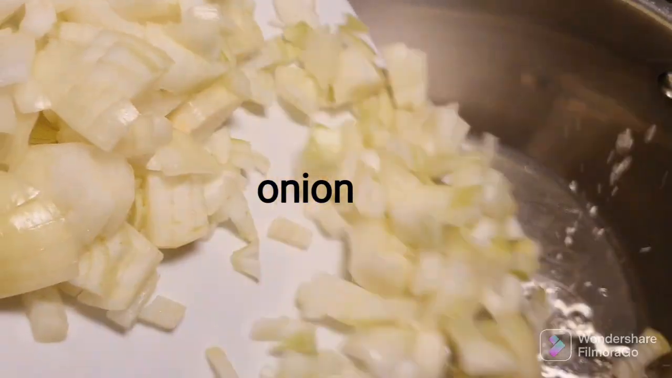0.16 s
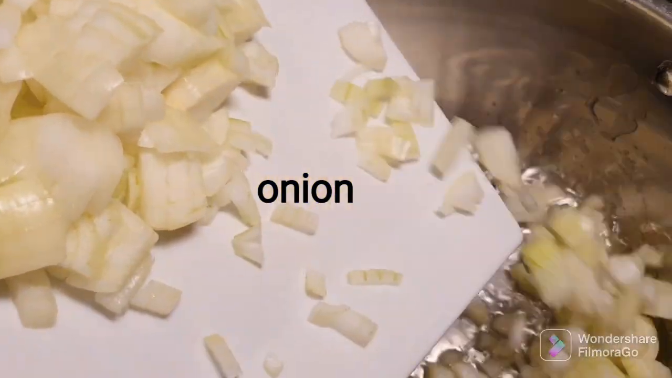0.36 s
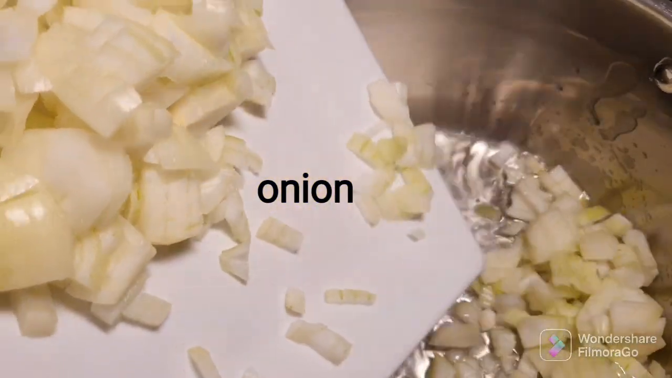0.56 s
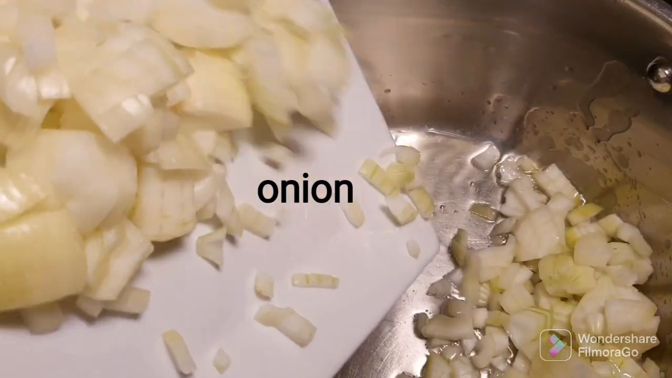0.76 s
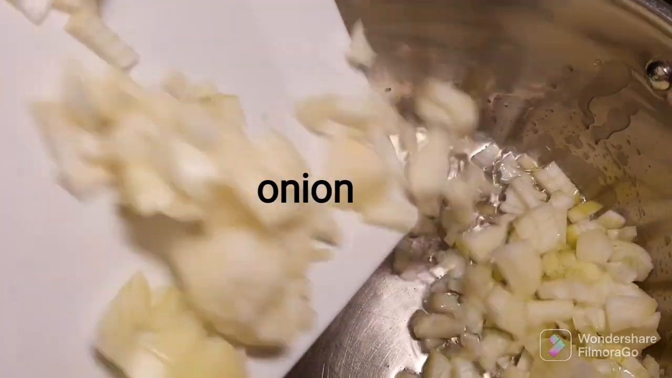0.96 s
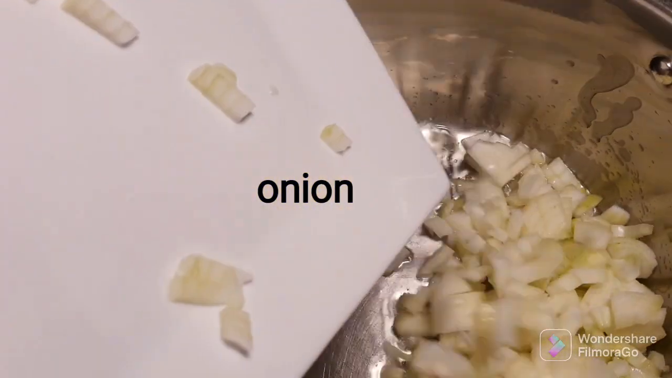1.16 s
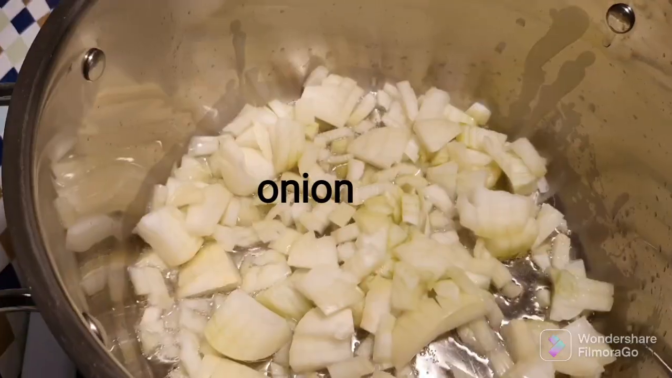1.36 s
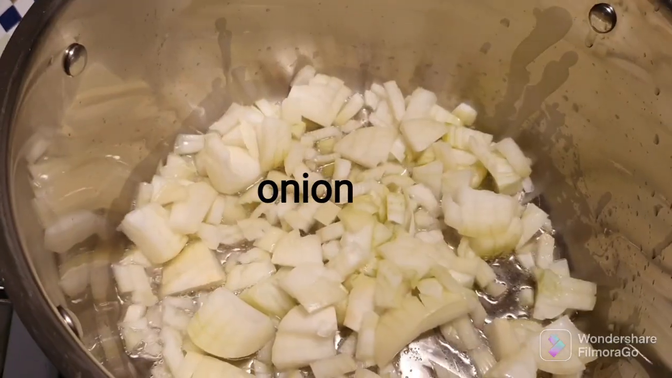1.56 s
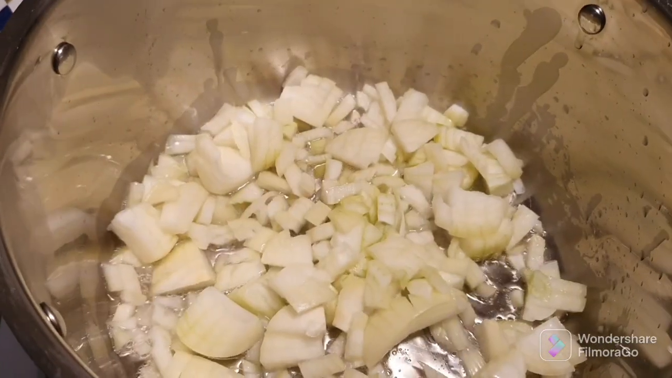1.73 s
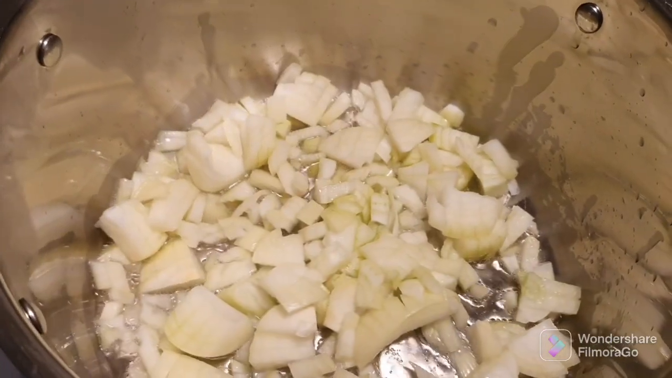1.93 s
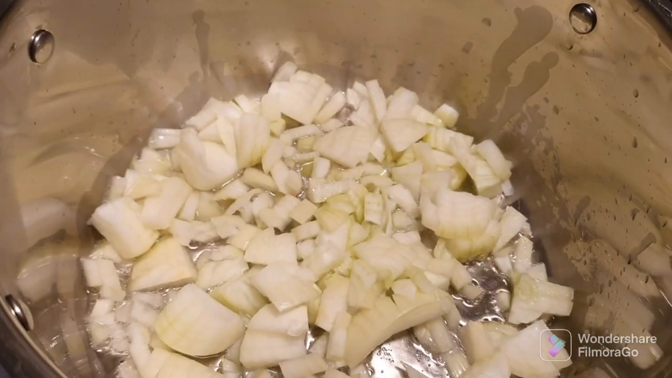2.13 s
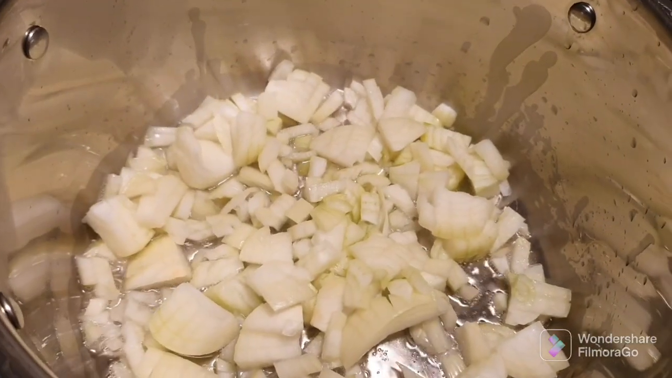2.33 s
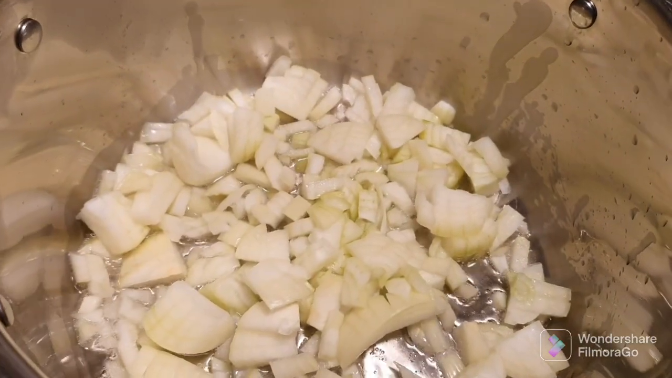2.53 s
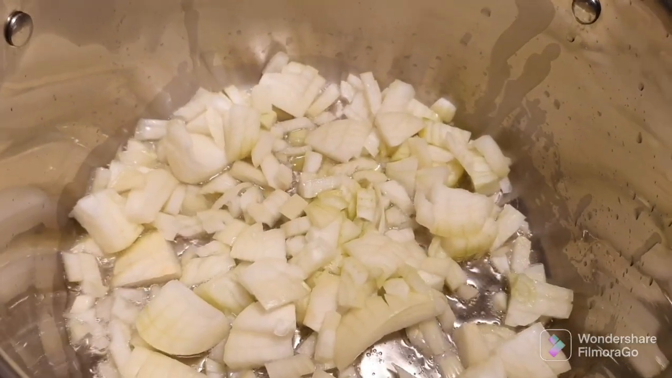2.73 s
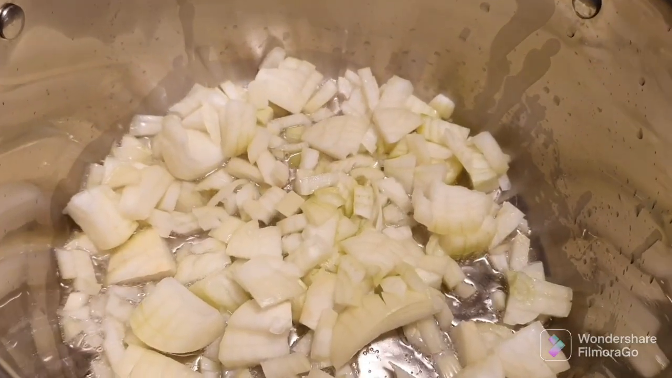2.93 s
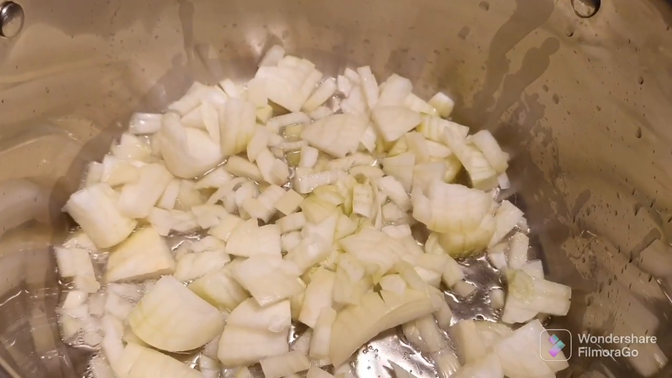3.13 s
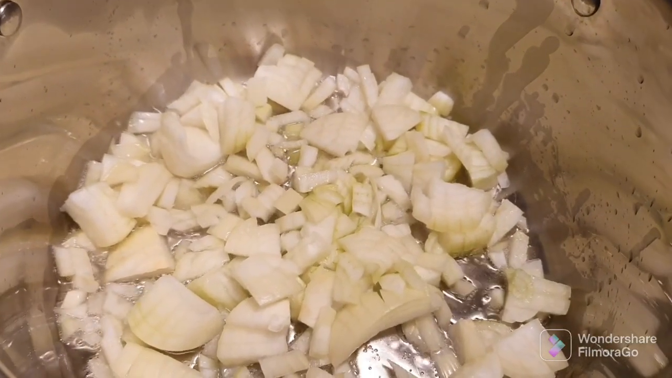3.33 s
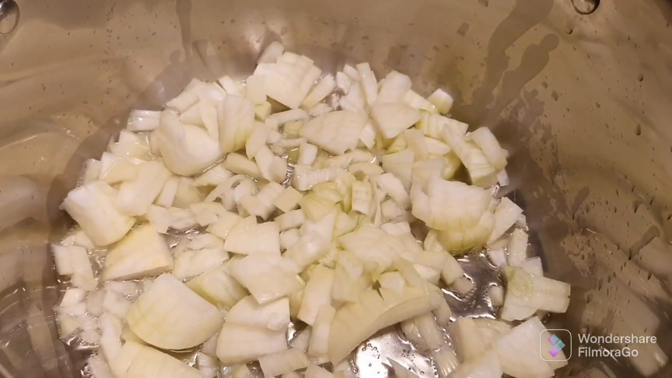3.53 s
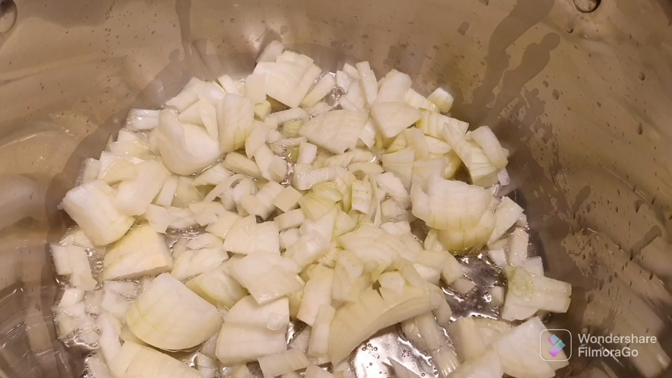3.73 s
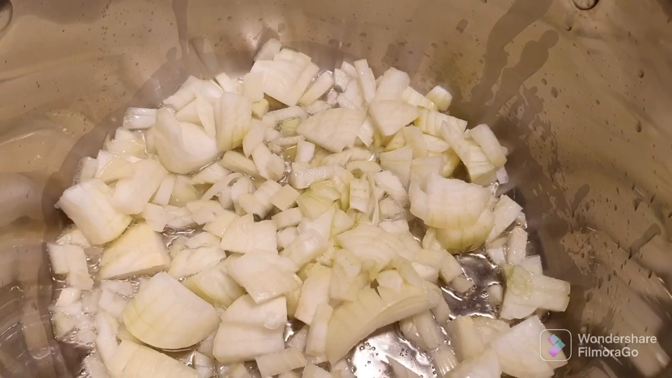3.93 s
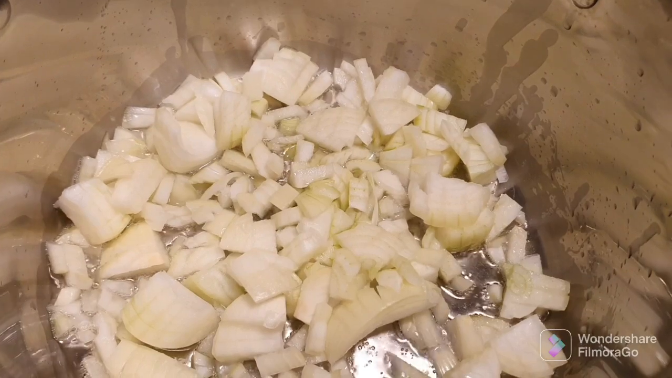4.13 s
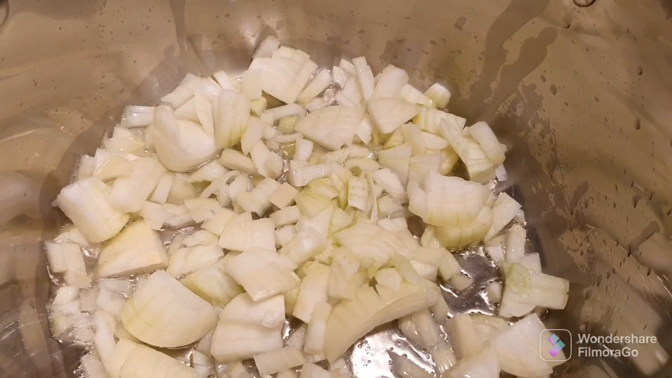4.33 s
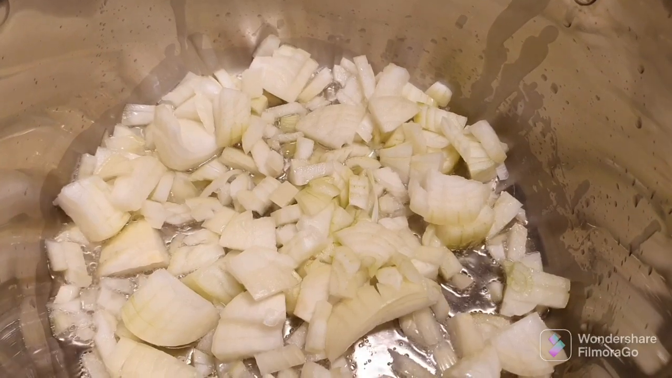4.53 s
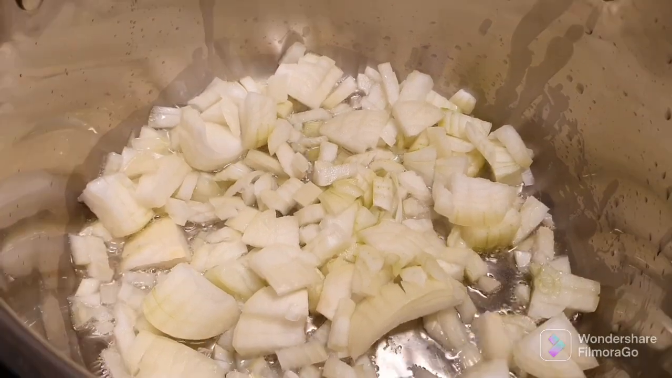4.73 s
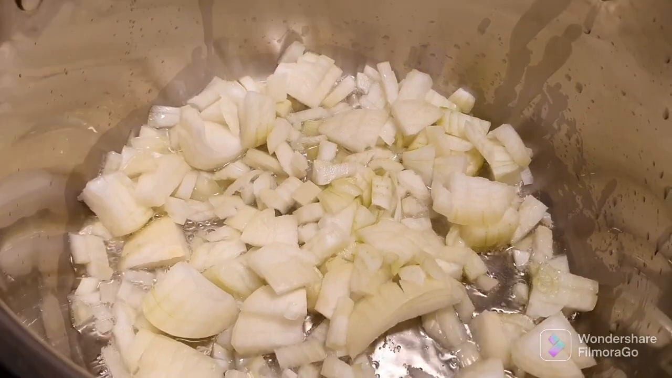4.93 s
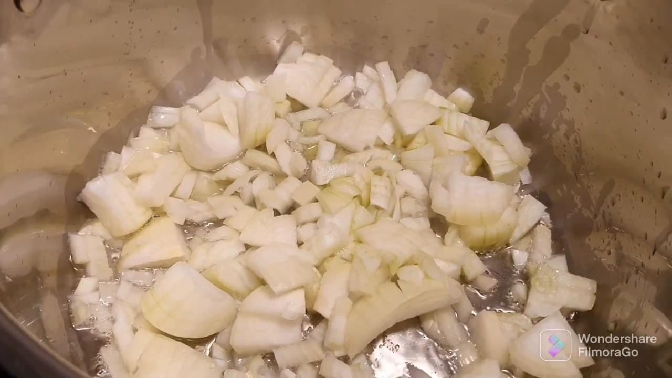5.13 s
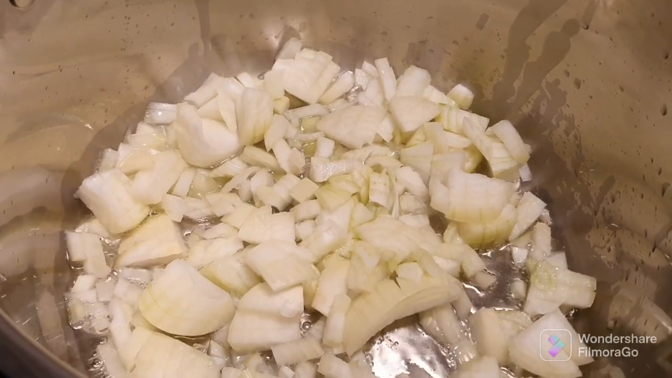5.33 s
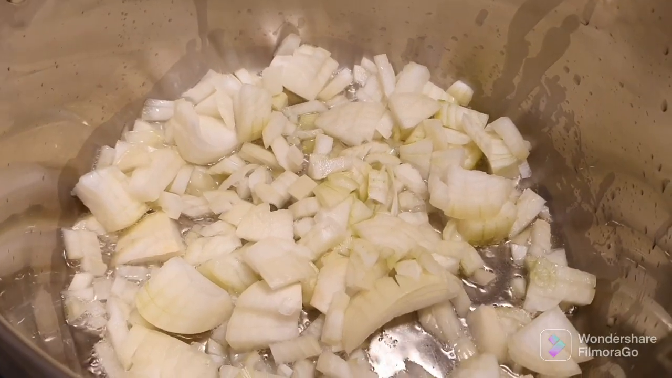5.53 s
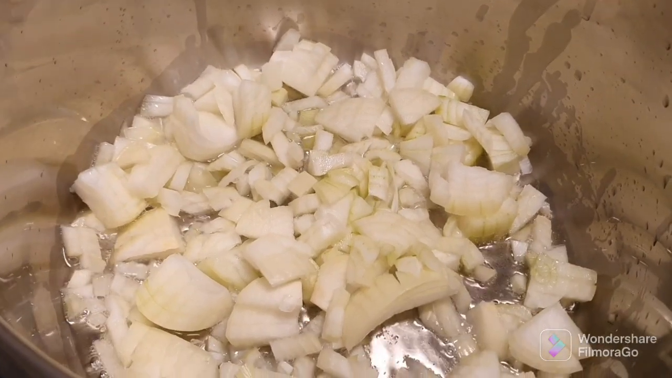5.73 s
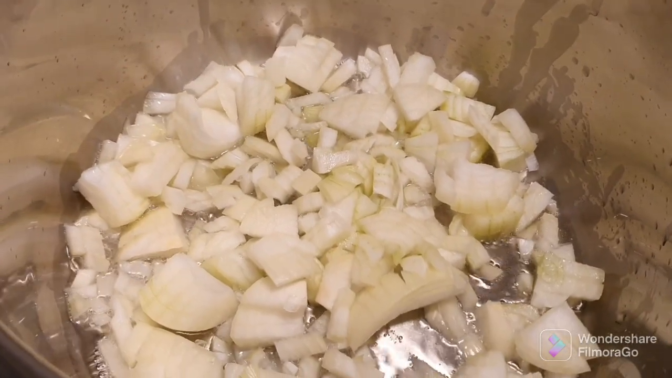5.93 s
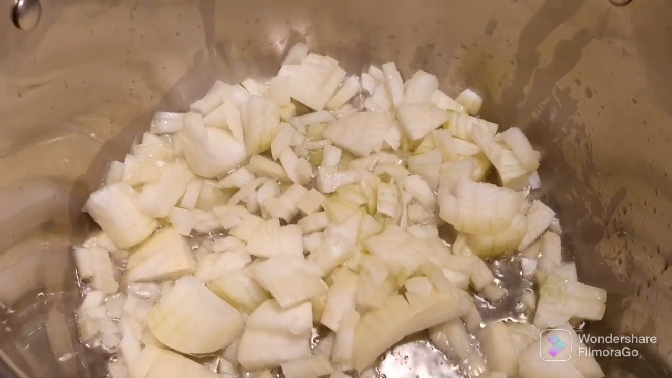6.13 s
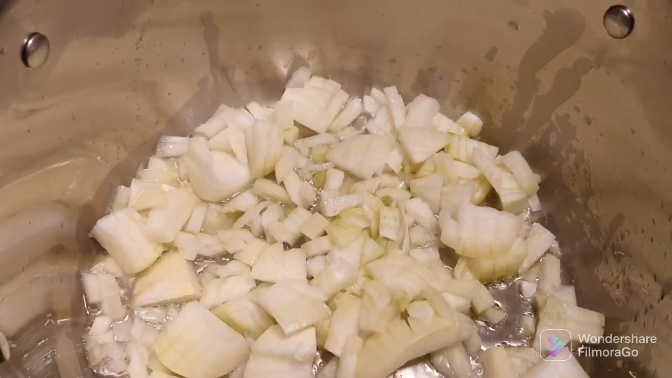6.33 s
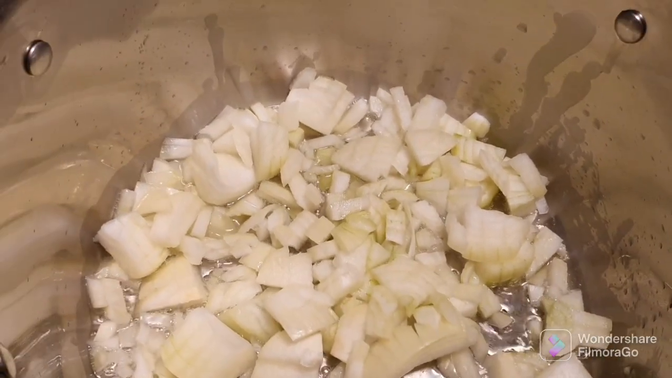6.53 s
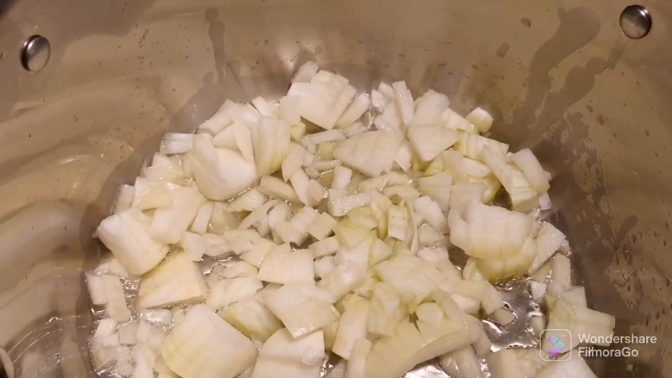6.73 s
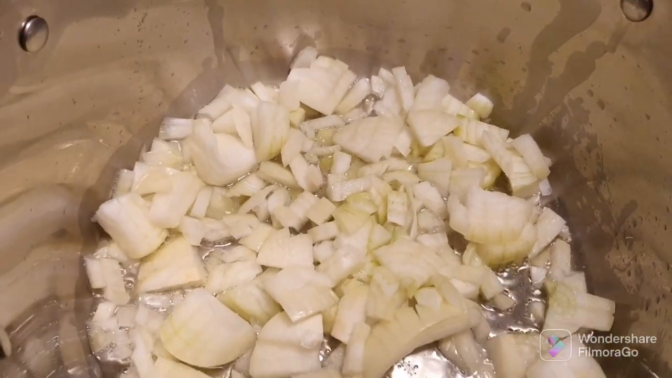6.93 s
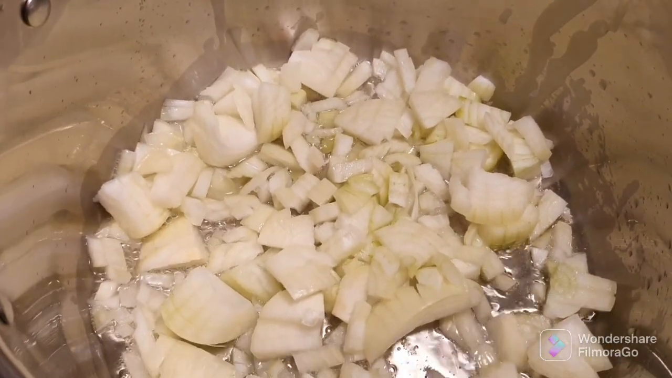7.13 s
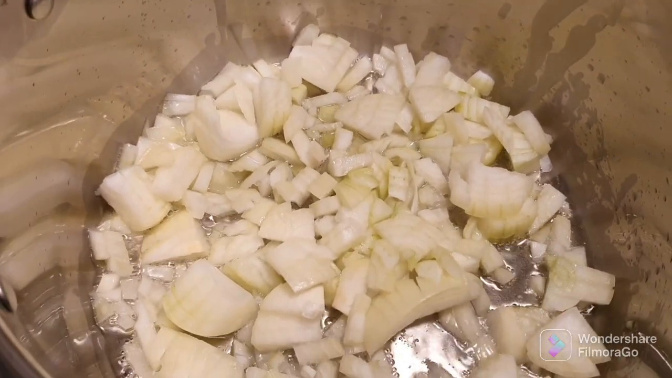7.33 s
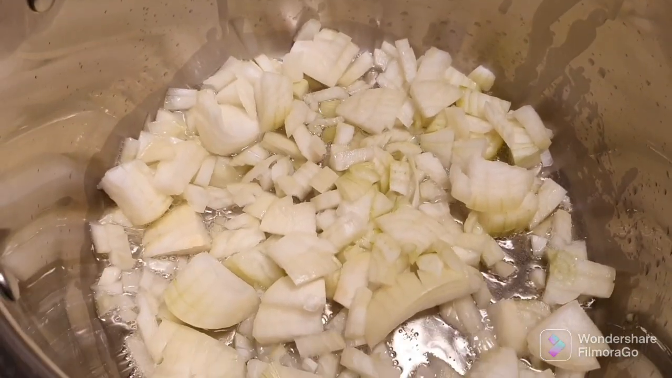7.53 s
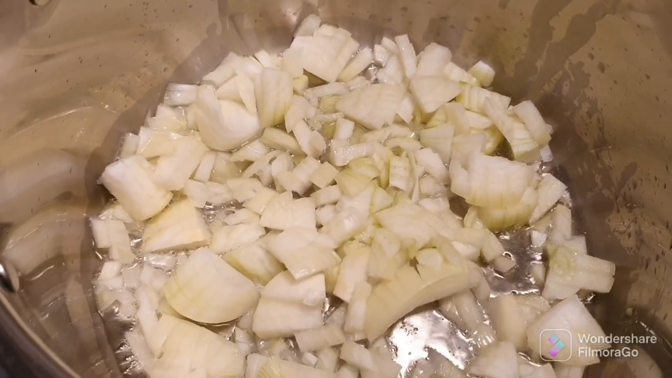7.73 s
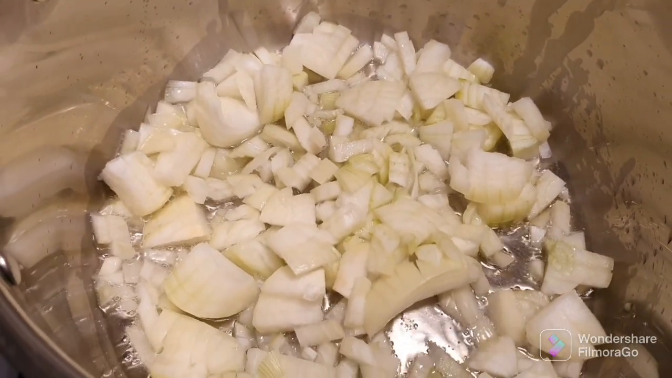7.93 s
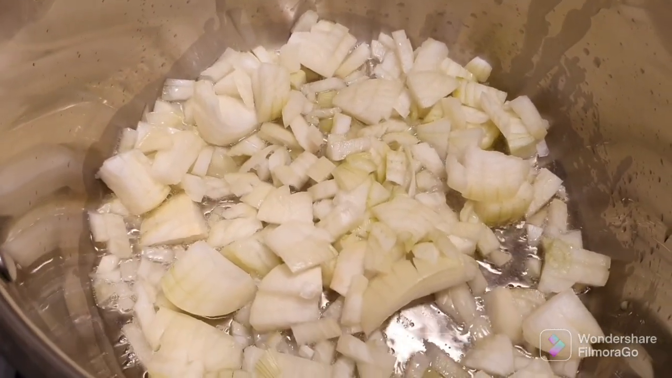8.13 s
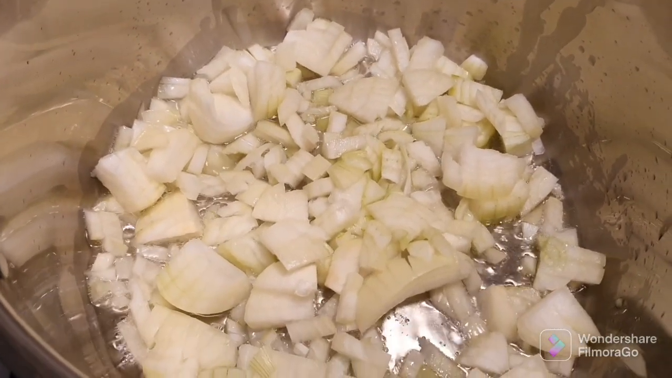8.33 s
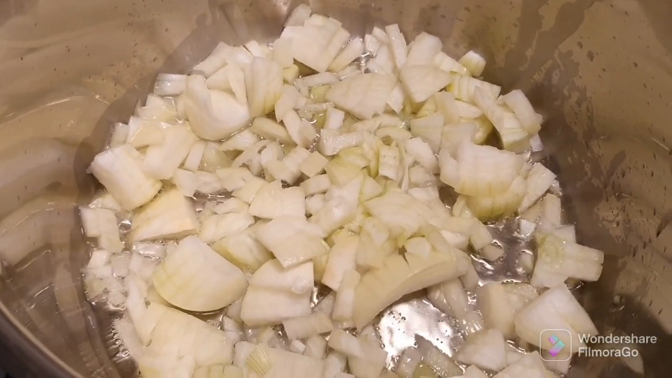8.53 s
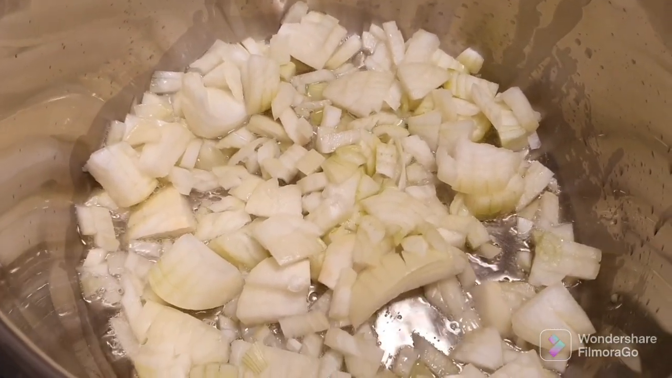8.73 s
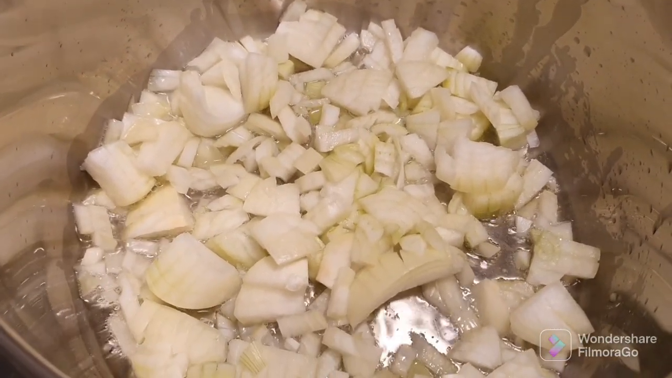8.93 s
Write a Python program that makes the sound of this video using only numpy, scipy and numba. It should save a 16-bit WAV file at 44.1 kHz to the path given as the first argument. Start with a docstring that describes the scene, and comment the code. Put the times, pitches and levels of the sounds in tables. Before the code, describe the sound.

A faint steel rub and low drone, then wet onion pieces tumble into hot oil, splashing and slapping softly as the sizzle bursts up. The plastic board strikes the metal rim with a bright, rattling knock. More pieces fall, the board leaves, and fine crackling continues inside the resonant pot, heard close from above, with scattered loud pops, a brief gap midway and rougher, gradually louder frying.

```python
"""A low stove drone and a faint rub of steel come first; then chopped onion slides off a board into hot oil.
Water boils out of the wet pieces in thousands of tiny bursts a second, with a louder spit now and then.
Each heap flares up and sinks to a steady sizzle; halfway the sound drops out for an instant, and the sizzle
is at once coarser, then grows as the pot regains its heat. Standing waves of the air in the pot colour it,
the plastic board chatters on the resonant steel wall, and two microphone ports above the rim hear it all."""
import sys
import numpy as np
from scipy import signal
from scipy.fft import rfft, irfft
from scipy.io import wavfile
from scipy.ndimage import uniform_filter1d, minimum_filter1d
from numba import njit

SR = 44100
rng = np.random.default_rng(int(sys.argv[2]) if len(sys.argv) > 2 else 0)


def to_wav(s):
    """Save 16-bit WAV."""
    ch = np.atleast_2d(s).T  # columns
    pcm = np.round(np.clip(ch, -1, 1) * 32767)  # PCM
    wavfile.write(sys.argv[1], SR, pcm.astype(np.int16))


N = 395577
TIME = np.arange(N) / SR

# low drone of the stove, relative spectrum: (f/Hz, level/dB)
STOVE_SPECTRUM = [(20, -19), (35, -39), (55, 5), (80, -5.5), (120, 5.5), (155, -5.5), (225, 8.5), (300, -6),
                  (450, 0), (1000, -17.5), (2300, -41), (3200, -34), (6000, -36), (12000, -52)]
# modes of the steel wall: (f/Hz, relative level/dB, time to fall by 60 dB t/s)
STEEL_MODES = [(169.4, -30.5, 0.28), (382, -28, 0.47), (455, -38, 0.3), (565, -21, 0.2), (795, -17, 0.17),
               (906, -17, 0.21), (998, -24, 0.3), (1308, -16, 0.13), (1580, -16, 0.08), (1835, -22, 0.17),
               (2115, -14.5, 0.19), (2375, -29, 0.35), (2492, -26, 0.6), (2728, -22, 0.13),
               (3305, -17, 0.1), (3480, -19, 0.1), (3560, -25, 0.18), (4040, -25, 0.16), (4850, -18, 0.15),
               (5635, -21, 0.11), (5951, -28, 0.2), (6204, -24, 0.16), (6870, -31, 0.17)]
# pieces sliding off the board and tumbling over each other: (start t/s, length t/s, level/dB)
SLIDES = [(0.01, 0.09, -57), (0.122, 0.043, -41), (0.27, .03, -38), (0.366, 0.084, -43), (0.53, 0.033, -54),
          (0.704, .025, -46), (0.78, 0.018, -38.5), (0.996, 0.024, -40.5), (1.07, 0.034, -44),
          (1.156, 0.061, -47), (1.445, 0.24, -72)]
# clumps landing or slumping in the oil, relative levels: (t/s, splash level/dB, thud level/dB, tap level/dB)
CLUMPS = [(0.1072, -30, -49, -43), (0.13, -21, -49.5, -30.5), (0.159, -34, -31, -43),
          (0.183, -30, -52, -52), (0.221, -32, -35, -32.5), (0.2485, -9.5, -40, -39), (.299, -38, -34, -36),
          (.366, -24, -31.5, -56), (.423, -40, -39, -43), (.439, -25, -31, -32), (0.458, -29, -29, -41),
          (.485, -22, -33, -48), (.878, -28, -57, -30.5), (1.0092, -15.5, -43, -45), (1.074, -47, -52, -44),
          (1.1142, -15, -39, -56), (1.134, -38, -52, -38), (1.199, -22, -49, -45),
          (1.2142, -15, -28.5, -42), (1.258, -17, -34, -49), (1.28, -20, -38, -56), (1.461, -20, -63, -44),
          (1.706, -15, -59, -48), (1.72, -23, -54, -42), (1.733, -39, -50, -42), (4.477, -21, -65, -37)]
# heaps of onion reaching the oil: (t/s, relative level of the lasting sizzle/dB)
HEAPS = [(.128, -58), (.236, -45.5), (.39, -41.5), (.52, -41.5), (.98, -43), (1.17, -50.5), (1.42, -46.5)]
# standing waves of the air under the board: (f/Hz, width/Hz, level over the direct sound/dB)
COVERED_AIR_MODES = [(224, 16, 11), (449, 28.6, 19), (975, 39, 14.5), (1085, 96, 11), (1896, 240, 2.5),
                     (2440, 210, -1)]
# standing waves of the air in the open pot: (f/Hz, width/Hz, level over the direct sound/dB)
OPEN_AIR_MODES = [(222, 11.4, 13.5), (437, 62, 14), (987.5, 43.6, 11.5), (1386, 22, 5), (1510, 26, 7.5),
                  (1828, 18.6, 9.5), (2154, 27, -7), (2497, 27, 3.5), (747, 32, 1)]
# gain for the crackle under the board: (f/Hz, level/dB)
BOARD_GAIN = [(250, 6.5), (550, -2.5), (700, 5), (830, -14.5), (980, 9), (1500, 1.5), (2200, 0)]
# gain for all the crackle: (f/Hz, level/dB)
SIZZLE_GAIN = [(150, -26.5), (330, -22), (630, -23.5), (800, -15.5), (1200, -12.5), (2000, -6),
               (2700, -0.84), (3700, -0.5), (4900, -2), (6300, -13.5), (7700, -19), (10000, -22.5),
               (13000, -28), (15300, -35.5)]
# relative spectrum of patter and slaps: (f/Hz, level/dB)
TAP_SPECTRUM = [(100, -26), (300, -6), (500, -9.5), (720, 1.5), (1000, -9), (1600, -2), (3000, -32),
                (6000, -38)]
# relative spectrum of the tumbling pieces: (f/Hz, level/dB)
TUMBLE_SPECTRUM = [(25, -17), (50, 5), (100, 7.5), (150, -2.5), (230, -14.5), (330, -9), (450, -8.5),
                   (700, -5), (1100, -13), (1600, -19), (3000, -28), (6000, -33)]
# drops of water bursting in the oil: (t/s, peak level/dB, f/Hz, rise t/ms, wall echoes relative to the ping/dB)
SPITS = [(0.248, -17, 3120, 0.35, -10), (0.25, -20, 3400, 0.34, -4), (.281, -25, 6040, 0.32, 5),
         (0.8442, -7.5, 4520, 0.58, -2), (1.0935, -25, 3020, .7, -4), (1.206, -15, 2960, 0.48, -2),
         (1.215, -19, 3200, 0.28, -1), (1.8496, -9, 4380, 0.53, -14), (2.186, -16, 3380, 0.64, -3),
         (2.949, -22, 4120, 0.37, -1), (3.9172, -7.5, 3080, 0.36, -10), (3.9174, -14, 5000, 0.44, -2),
         (4.137, -27, 3030, 0.27, 4), (6.912, -30, 5610, 1.4, -1), (6.919, -26, 4790, 4.4, -1),
         (7.6286, -12.5, 3150, 0.58, -1), (7.6316, -12, 3500, 0.31, -6), (7.662, -25, 2950, 0.7, 4),
         (8.716, -18, 2930, 0.21, -9)]
# blows of the board on the pot, relative levels: (t/s, clack level/dB, ring level/dB)
KNOCKS = [(0.7231, -3, -2.5), (0.728, -17.5, -34), (0.7356, -26, -26), (0.7388, -24, -28),
          (0.7488, -20, -20), (0.757, -31, -28), (0.767, -26, -17), (0.8007, -24, -21), (0.8037, -22, -18),
          (0.817, -30, -30)]
# relative spectrum of the plastic clack: (f/Hz, level/dB)
CLACK_SPECTRUM = [(100, -29), (250, -9), (530, 9.5), (700, 1.5), (900, 15), (1300, 6), (1900, 9),
                  (3000, -4), (3650, 5), (4200, -0.5), (5500, -2), (7500, -19), (12000, -28), (15000, -67)]
# difference between the two ports for sound from the pot: (f/Hz, left minus right level/dB)
PORT_DIFFERENCE = [(120, -3), (220, -5), (370, -2.5), (500, 0), (1200, 2.5), (2200, -1.5), (3000, -4.5),
                   (4000, -6), (4500, 4.5), (5100, 6.5), (6300, 12.5), (8000, 4), (8800, 0.5), (9900, 2),
                   (13500, -6.5)]
# the instant for which the sound drops out: (start t/s, end t/s)
DROPOUT = (4.742, 4.7772)

TOP_HZ = 15750  # upper edge of the passband
FLARE_RISE_S, FLARE_DB, FLARE_S = 0.058, 9, 0.11  # a heap flares up until its surface water is gone
BOARD_AWAY_S, BOARD_LIFT_S = 1.703, 0.074
BOARD_DB = 4  # the board throws the sizzle back while it covers the pot
COARSE_DB, SMALL_DB, SPRAY_DB = 1.5, 2.5, 5.5  # coarse and small bubbles, fine spray against middle sizes
BOARD_COARSE_DB, BOARD_SMALL_DB, BOARD_SPRAY_DB = -4, -2, -1.5  # their change under the board
DRYING_DB_PER_S = 0.72  # the spray thins as the pieces dry
LATER_S, LATER_COARSE_DB, LATER_SMALL_DB = 4.76, 3, -7  # from here on the sizzle is at once coarser
REHEAT_DB_PER_S, REHEAT_FINER_DB_PER_S = 1.05, 0.57  # then the pot regains its heat: louder, and finer again
WAVER_DB = 0.65  # spread of the slow wavering of each bubble size
SLIDE_ATTACK_S, SLIDE_RELEASE_DB_PER_S = 0.03, 112
STEAM_DRIFT, STEAM_DRIFT_HZ = 0.0075, 9  # drifting steam detunes the air: share of the pitch, changes a second
BOARD_DETOUR_MS = .53


def undb(db):
    """Amplitude ratio: 20 dB is a factor of ten."""
    return 10 ** (np.asarray(db) / 20)


def unit(x):
    """Normalisation: scale to an rms of 1."""
    return x / np.sqrt(np.mean(x ** 2))


def convolve(x, response):
    """Linear superposition: pass a sound through an impulse response, keeping its length."""
    return signal.fftconvolve(np.atleast_2d(x), np.atleast_2d(response), axes=-1)[:, :x.shape[-1]]


def colour(x, points, scale=1, size=4096):
    """Minimum-phase filtering: the folded cepstrum of a gain curve through (f/Hz, level/dB) is causal."""
    hz, db = np.transpose(points)
    bins_hz = np.fft.rfftfreq(size, 1 / SR)
    gain = undb(scale * np.interp(np.log(bins_hz + 1), np.log(hz), db))
    cepstrum = irfft(np.log(gain))
    cepstrum[1:size // 2] *= 2
    cepstrum[size // 2 + 1:] = 0
    return convolve(x, irfft(np.exp(rfft(cepstrum))))


def lowpass(x, hz):
    """Zero-phase filtering: low-pass without phase shift, so that the rest is a clean high-pass."""
    return signal.sosfiltfilt(signal.butter(3, min(hz, .45 * SR), fs=SR, output="sos"), x)


def walk(rate_hz):
    """Random fluctuation: chance values joined by straight lines, with a spread near 1."""
    knots = rng.standard_normal(4096)
    return np.interp(TIME * rate_hz, np.arange(len(knots)), knots) * np.sqrt(3 / 2)


def add(out, s, sound):
    """Superposition: mix a short sound in at time s."""
    i = max(int(s * SR), 0)
    out[:, i:i + sound.shape[-1]] += sound[..., :N - i]


def since(s):
    """Elapsed time: seconds gone by since time s, zero before it."""
    return np.maximum(TIME - s, 0)


def covered():
    """Screening: 1 while the board lies over the pot, falling to 0 as it is lifted away."""
    return 1 - np.minimum(since(BOARD_AWAY_S) / BOARD_LIFT_S, 1)


def stove(early_db=-61, late_db=-65.5, hum_hz=102, hum_db=-67, hum_from_s=4.2):
    """Correlated noise gives a drone nearly alike at both ports; later it sinks as a wavering hum joins in."""
    noise = rng.standard_normal(N) + .25 * rng.standard_normal((2, N))
    late = np.clip(TIME - hum_from_s, 0, 1)
    drone_db = early_db + (late_db - early_db) * late + walk(6.2)
    phase = 2 * np.pi * np.cumsum(hum_hz + 3 * walk(34)) / SR
    hum = (np.sin(phase) + 0.75 * np.sin(phase / 2)) * undb(hum_db + 2 * walk(7.6))
    return unit(colour(noise, STOVE_SPECTRUM)) * undb(drone_db) + hum * late


def rim_rub(level_db=-61, until_s=0.25, width_hz=14, low_hz=1700, high_hz=3700):
    """Forced vibration: the tilting board rubs on the rim and keeps the middle steel modes ringing faintly."""
    rub = rng.standard_normal((2, N))
    t = TIME[:8192]
    ring = sum(np.exp(-np.pi * width_hz * t) * np.sin(2 * np.pi * hz * t) * t60
               for hz, _, t60 in STEEL_MODES if low_hz < hz < high_hz)
    return unit(convolve(rub, ring)) * undb(level_db - SLIDE_RELEASE_DB_PER_S * since(until_s))


def tumbling():
    """Amplitude envelope: each slide starts quickly, holds and dies away exponentially."""
    return sum(np.minimum(since(s) / SLIDE_ATTACK_S, 1) * undb(db - SLIDE_RELEASE_DB_PER_S * since(s + length))
               for s, length, db in SLIDES)


def bursts(count, spread_db, lag_ms=-.115, scatter_ms=.07):
    """Shot noise: mostly small random clicks, each reaching the two ports with the lag of its place in the pot."""
    when, place, sign = rng.random((count, 3)).T
    size = np.sign(sign - .5) * undb(spread_db * np.minimum(rng.exponential(size=count), 7))
    lag = (lag_ms + scatter_ms * np.tan(2.6 * (place - .5))) * SR / 1000
    left = np.bincount((when * N + lag).astype(int) % N, size, N)
    right = np.bincount((when * N).astype(int), size, N)
    return np.array([left, right])


def wall_echoes(t60_s, size=4096):
    """Reverberation: dense decaying reflections between the steel walls, different at each port; energy 1."""
    t = TIME[:size]
    echoes = rng.standard_normal((2, size)) * undb(-60 * t / t60_s) * (t > .0007)
    echoes -= lowpass(echoes, 1100)
    return echoes / np.sqrt(np.sum(echoes ** 2) / 2)


def in_pot(x, echo_db=-3, echo_t60_s=0.15):
    """Reflection: a sound at one place in the pot, with the echoes that belong to that place."""
    return x + undb(echo_db) * convolve(x, wall_echoes(echo_t60_s))


def round_the_board(x):
    """Path difference: the board makes sound reach the left port late, by way of the gap on the right."""
    return np.array([np.roll(x[0], int(BOARD_DETOUR_MS * SR / 1000)), x[1]])


@njit
def resonate(x, pole):
    """Resonance: one damped oscillator whose tuning may move from sample to sample."""
    out = np.zeros(x.shape)
    for c in range(x.shape[0]):
        z = 0j
        for i in range(x.shape[1]):
            z = z * pole[i] + x[c, i] + 1e-18
            out[c, i] = z.real
    return out


def pot_air(x, modes):
    """Standing waves: the air in the pot rings with every burst, each mode wavering as steam drifts through."""
    out = x
    for hz, width_hz, db in modes:
        pitch_hz = hz * (1 + STEAM_DRIFT * walk(STEAM_DRIFT_HZ))
        pole = np.exp(np.pi * (2j * pitch_hz - width_hz) / SR)
        out = out + undb(db) * 2 * np.pi * width_hz / SR * resonate(x, pole)
    return out


def bubbles(count=3500, low_hz=2700, high_hz=6300, ring_ms=0.94, rise_per_s=12, spread_db=1.0):
    """Damped bubble oscillation: each rings a few cycles at its own, slightly rising pitch; rms 1."""
    out, t = np.zeros((2, N)), TIME[:512]
    for when, pitch, size, place in rng.random((count, 4)):
        hz = low_hz * (high_hz / low_hz) ** pitch
        age_s = np.maximum(t - np.array([[place], [1]]) / 4000, 0)  # the place sets the lag between the ports
        ping = np.exp(-1000 * age_s / ring_ms) * np.sin(2 * np.pi * hz * age_s * (1 + rise_per_s * age_s))
        add(out, when * TIME[-1], undb(spread_db * np.log(max(size, .01))) * ping)
    return unit(in_pot(out))


def crackle(layers=3, flurry_db=.5, bubbles_db=-9):
    """Steam bursts excite the air modes, which change once the board is gone; rms near 1, in random flurries."""
    pops = unit(sum(in_pot(bursts(count=55000, spread_db=1.5)) for _ in range(layers)))
    pops = pops + undb(bubbles_db) * bubbles()
    board = covered()
    open_sound = pot_air(pops, OPEN_AIR_MODES)
    covered_sound = round_the_board(colour(pot_air(pops, COVERED_AIR_MODES), BOARD_GAIN))
    sound = (1 - board) * open_sound + board * covered_sound
    return unit(colour(sound, SIZZLE_GAIN)) * undb(flurry_db * (walk(19) / 2 + walk(70)))


def onions(pops, splash_t60_s=0.052, thud_hz=104, thud_scatter=0.18, thud_t60_s=0.076, tap_t60_s=0.11,
           splash_db=-13, slap_db=19.5, patter_db=-2):
    """Impact: each soft clump thuds on the base, slaps the air, patters and makes the crackle flare up."""
    splash, thud, tap, slap = np.zeros((4, 1, N))
    t = TIME[:SR // 2]
    for s, wet_db, thud_db, tap_db in CLUMPS:
        hz = thud_hz * np.exp(thud_scatter * rng.standard_normal())
        add(splash, s, undb(wet_db + splash_db - 60 * t / splash_t60_s))
        add(thud, s, undb(thud_db - 60 * t / thud_t60_s) * np.sin(2 * np.pi * hz * t))
        add(tap, s, undb(tap_db + patter_db - 60 * t / tap_t60_s))
        add(slap, s, undb([tap_db + slap_db]))  # a single-sample impulse
    pieces = pot_air(round_the_board(bursts(count=6000, spread_db=1.2)), COVERED_AIR_MODES)
    slaps = pot_air(round_the_board(in_pot(colour(slap, TAP_SPECTRUM))), COVERED_AIR_MODES)
    patter = tap * unit(colour(pieces, TAP_SPECTRUM))
    slides = tumbling() * unit(colour(pieces, TUMBLE_SPECTRUM))
    return splash * pops + thud - lowpass(thud, 42) + slaps + patter + slides


def boiling():
    """Addition of powers: every heap flares up and sinks to a lasting sizzle; reheating lifts the sum."""
    power = 0
    for s, db in HEAPS:
        rise = 1 - np.exp(-since(s) / FLARE_RISE_S)
        flare = 1 + undb(FLARE_DB) ** 2 * np.exp(-since(s) / FLARE_S)
        power = power + undb(db) ** 2 * rise * flare
    return np.sqrt(power) * undb(REHEAT_DB_PER_S * since(LATER_S))


def sizzle(pops, oil_db=-48, oil_hiss_db=-58, surge_db=1.3):
    """Bubble size sets the band: fresh wet pieces spray finely, later all is at once coarser; oil simmers faintly."""
    board, later = covered(), TIME > LATER_S
    finer_db = REHEAT_FINER_DB_PER_S * since(LATER_S)
    coarse_db = COARSE_DB + BOARD_COARSE_DB * board + LATER_COARSE_DB * later - finer_db
    small_db = SMALL_DB + BOARD_SMALL_DB * board + LATER_SMALL_DB * later + finer_db
    spray_db = SPRAY_DB + BOARD_SPRAY_DB * board - DRYING_DB_PER_S * TIME
    coarse, body, whole = (lowpass(pops, hz) for hz in (2300, 4000, 7500))
    sizes = coarse * undb(coarse_db)
    sizes += (body - coarse) * undb(WAVER_DB * walk(9.8))
    sizes += (whole - body) * undb(small_db + WAVER_DB * walk(15))
    sizes += (pops - whole) * undb(spray_db + WAVER_DB * walk(12))
    board_gain = undb((BOARD_DB + surge_db * walk(30.95)) * board)
    simmer = coarse * undb(oil_db) + whole * undb(oil_hiss_db)
    return sizes * boiling() * board_gain + simmer


def spits(right_db=3, echo_t60_s=0.061, lag_ms=0.13, chirp=0.039):
    """Transient oscillation: a bursting drop pings a few cycles, rising in pitch, and bounces round the pot."""
    out, t = np.zeros((2, N)), TIME[:SR // 8]
    heard_s = np.maximum(t - np.array([[lag_ms / 1000], [0]]), 0)
    for s, db, hz, rise_ms, echo_db in SPITS:
        age = heard_s * 1000 / max(rise_ms, .1)
        pitch_hz = hz * (1 + chirp * np.tanh(age / 2 - .6))
        phase = 2 * np.pi * np.cumsum(pitch_hz * (heard_s > 0), axis=1) / SR
        ping = age ** 2 * np.exp(2 - 2 * age) * np.sin(phase)
        add(out, s, undb(db) * (ping + undb(echo_db) * convolve(ping, wall_echoes(echo_t60_s))))
    return out * undb([[0], [right_db]])


def knocks(clack_t60_s=0.037, crack_db=3, crack_t60_s=0.014, room_db=-17, room_t60_s=0.31, width=0.19,
           lag_ms=.41, contact_ms=0.27, pair_db=-9, split_hz=21, rattle_rad=0.32, rattle_hz=170):
    """Modal excitation: the board chatters on the rim, the steel wall rings on and the kitchen answers."""
    out, t = np.zeros((2, N)), TIME[:SR]
    opposite = np.array([[1], [-1]])
    contact = 1 - np.exp(-(1000 * t / contact_ms) ** 2)
    decay = undb(crack_db - 60 * t / crack_t60_s) + undb(-60 * t / clack_t60_s) + undb(room_db - 60 * t / room_t60_s)
    for s, clack_db, ring_db in KNOCKS:
        shared, side = rng.standard_normal((2, len(t)))
        # the board shades the left port, which hears the blow later
        noise = np.array([np.roll(shared, int(lag_ms * SR / 1000)), shared])
        noise = noise + opposite * width * (side - lowpass(side, 1200))
        blow = unit(colour(noise, CLACK_SPECTRUM)) * undb(clack_db) * decay
        for hz, mode_db, t60_s in STEEL_MODES:
            # short waves reach the two ports out of step
            phase = 2 * np.pi * (rng.random() + hz * t + opposite * rng.random() * hz / 7000)
            # the board rattles on the wall and roughens every mode
            phase += rattle_rad * np.interp(t * rattle_hz, np.arange(512), rng.standard_normal(512))
            # the handles split each mode into a close pair
            partner = np.sin(phase + 2 * np.pi * (split_hz * t + rng.random()))
            pair = np.sin(phase) + undb(pair_db) * partner
            blow += undb(ring_db + mode_db - 60 * t / t60_s) * pair
        add(out, s, blow * contact)
    return out


def steam_pocket(count=1300, hz=2985, scatter=0.042, rise_ms=4.1, glide_per_s=0.41, spread_db=1.0, level_db=-44):
    """Frequency modulation: steam escapes under the pieces in overlapping chirps, each sliding in pitch."""
    out, t = np.zeros((2, N)), TIME[:2048]
    age = 1000 * t / rise_ms
    times = rng.uniform(LATER_S, TIME[-1], count)
    for when, (pitch, glide, size) in zip(times, rng.standard_normal((count, 3))):
        phase = 2 * np.pi * hz * (1 + scatter * pitch) * t * (1 + glide_per_s * glide * t)
        ports = np.sin(phase - np.array([[1], [0]]))  # left lags by one radian
        add(out, when, undb(spread_db * size) * age * np.exp(-age) * ports)
    share = np.mean(TIME > LATER_S)  # makes the level hold for the part that sounds
    return unit(out) * np.sqrt(share) * undb(level_db)


def scene():
    """Directional hearing: pot sounds reach the ports from below; knocks, rub and stove skip that colouring."""
    pops = crackle()
    left, right = sizzle(pops) + onions(pops) + steam_pocket() + spits()
    from_pot = np.vstack([colour(left, PORT_DIFFERENCE, scale=.5), colour(right, PORT_DIFFERENCE, scale=-.5)])
    return from_pot + knocks() + rim_rub() + stove()


def record(dry):
    """Gain control: a fast limiter holds peaks at full scale; the sound drops out for an instant; the top is cut."""
    headroom = 1 / np.maximum(np.abs(dry).max(axis=0), 1)
    limited = dry * uniform_filter1d(minimum_filter1d(headroom, size=41), size=41)
    outside_dropout = (TIME < DROPOUT[0]) | (TIME > DROPOUT[1])
    live = uniform_filter1d(1. * outside_dropout, size=24)
    sound = limited * np.maximum(live, undb(-49))
    return signal.sosfilt(signal.ellip(10, .2, 80, TOP_HZ, fs=SR, output="sos"), sound)


dry = scene()
out = record(dry)
to_wav(out)
```